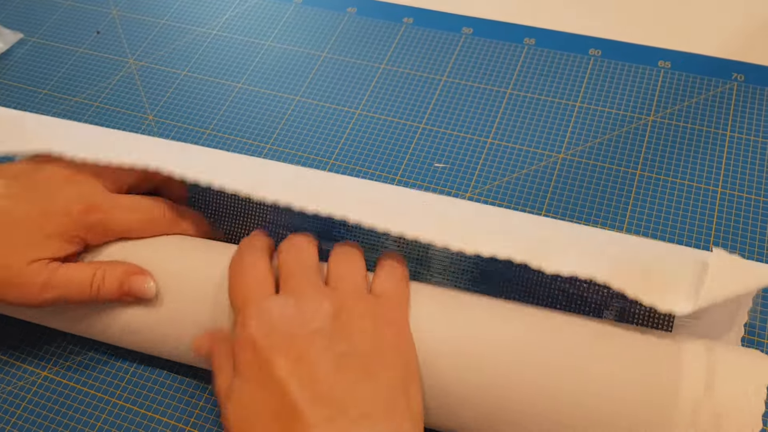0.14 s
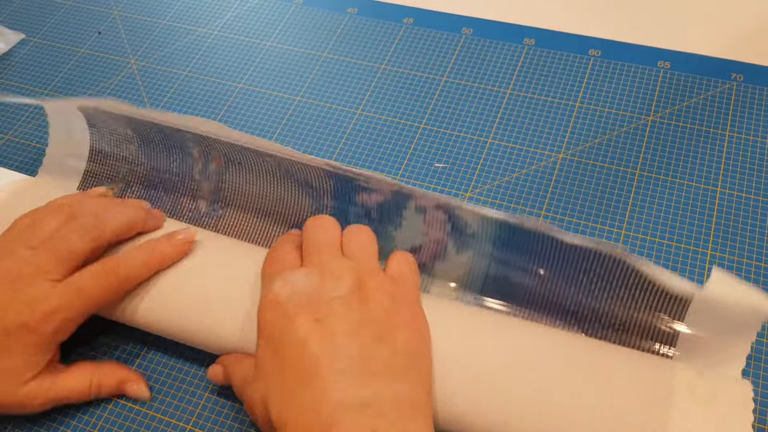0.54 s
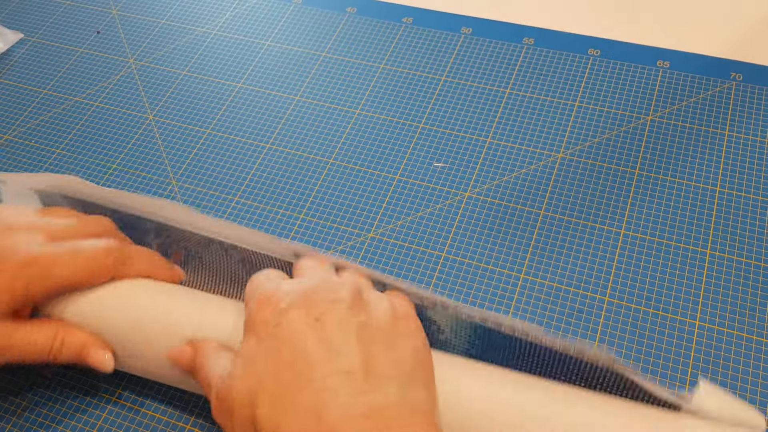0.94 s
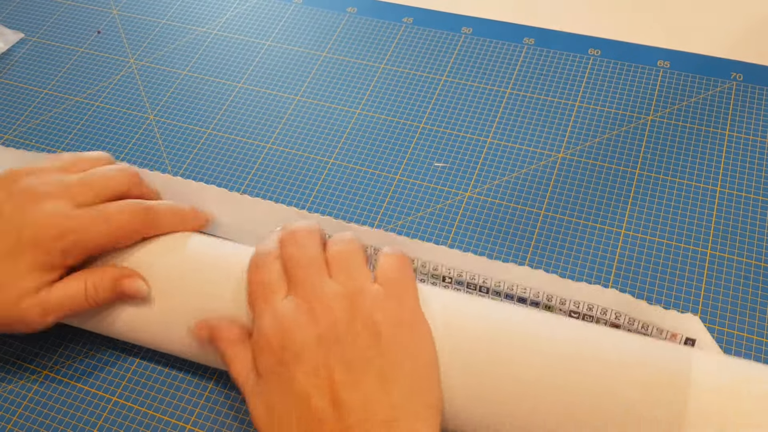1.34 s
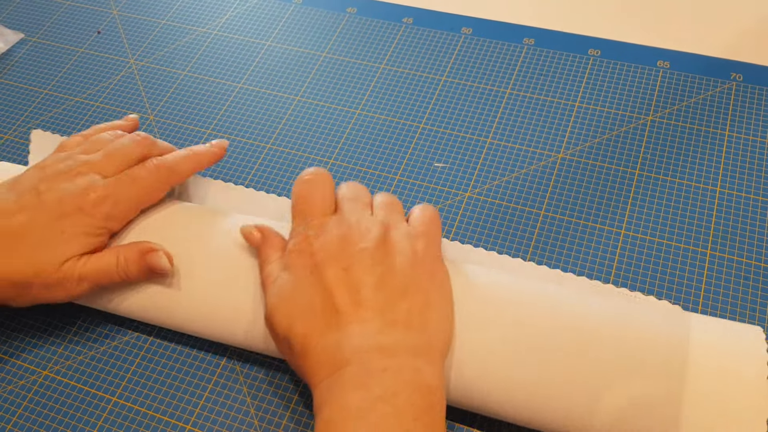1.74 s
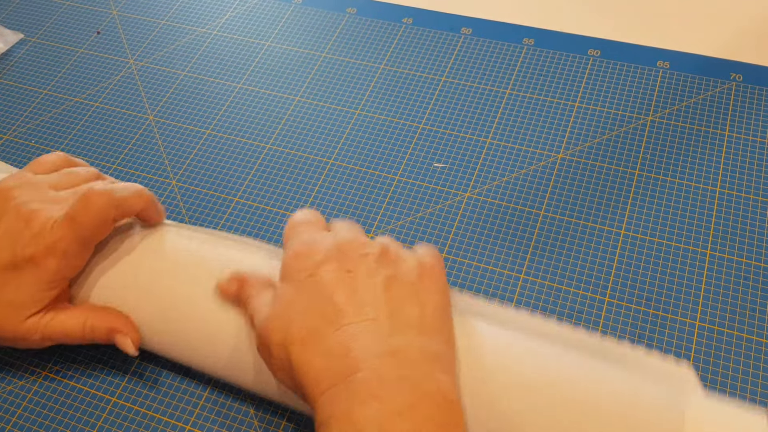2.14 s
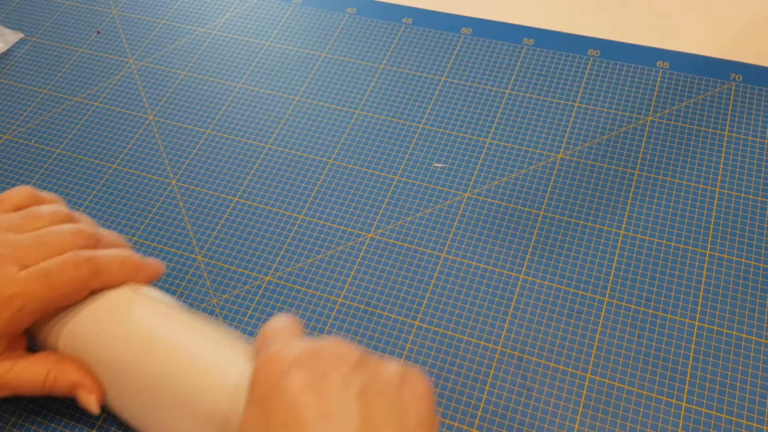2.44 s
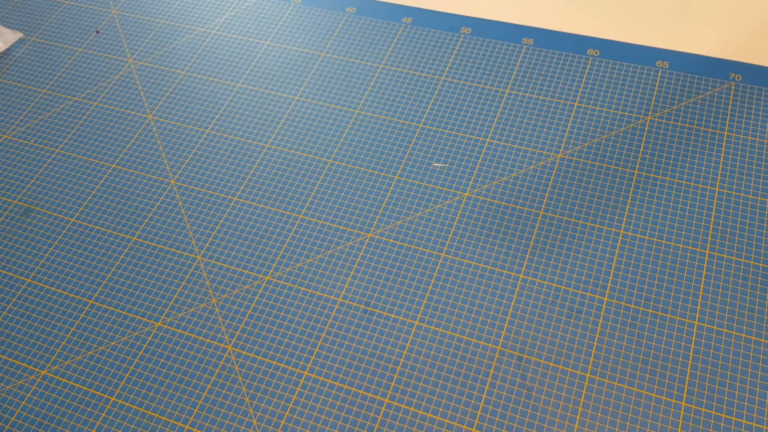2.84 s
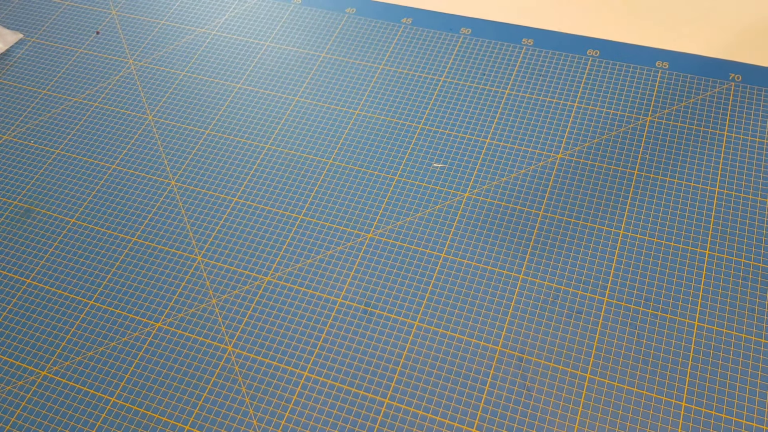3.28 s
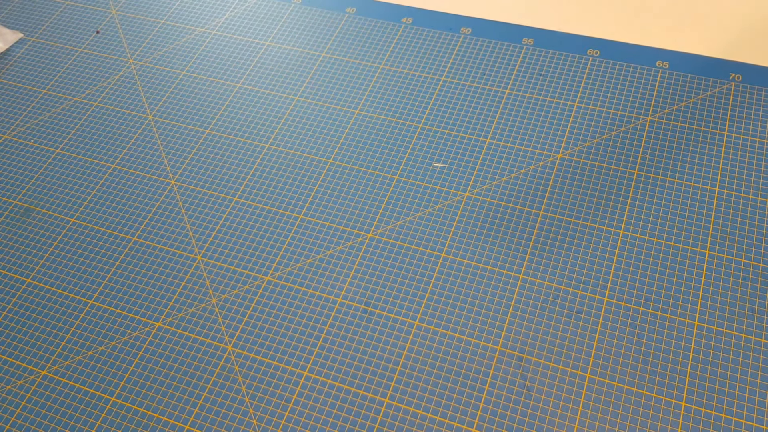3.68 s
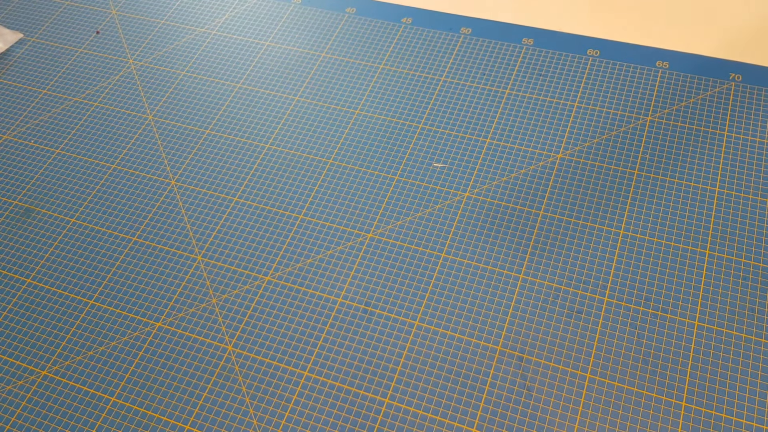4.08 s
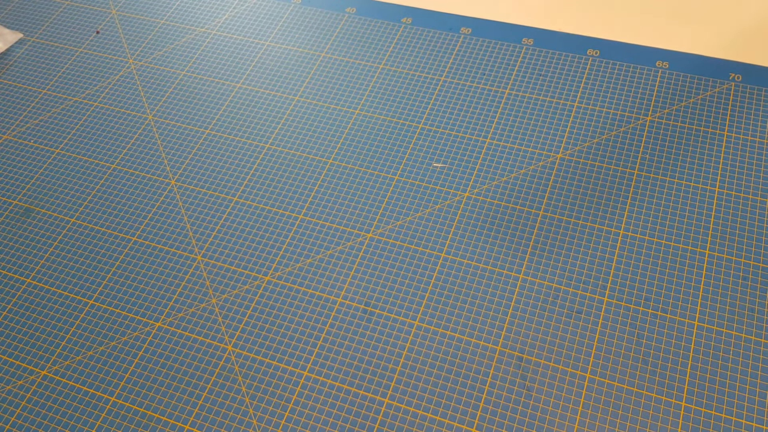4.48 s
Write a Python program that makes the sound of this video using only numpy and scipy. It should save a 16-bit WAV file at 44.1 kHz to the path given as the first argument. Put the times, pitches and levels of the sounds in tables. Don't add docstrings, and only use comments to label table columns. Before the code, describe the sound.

Hands roll up a stiff film-and-paper-backed sheet on a table mat, with dry rustling, crisp crackles and soft hollow taps, then carry it away.

```python
import sys
import numpy as np
from scipy import signal
from scipy.fft import rfft, irfft, next_fast_len
from scipy.io import wavfile
from scipy.ndimage import uniform_filter1d, map_coordinates

SR = 44100
rng = np.random.default_rng(int(sys.argv[2]) if len(sys.argv) > 2 else 0)


def level_to_linear(level):
    exponent = np.asarray(level, float) / 20
    return 10 ** exponent


def wav_record(signal):
    frames = np.transpose(np.atleast_2d(signal))
    bounded = np.clip(frames, -1, 1)
    quanta = np.round(bounded * 32767).astype(np.int16)
    wavfile.write(sys.argv[1], SR, quanta)


N = 203591
TIME = np.arange(N) / SR


def unit(x):
    return x / np.sqrt(np.mean(x ** 2) + 1e-20)


def along(points, hz):
    f, v = np.transpose(points)
    return np.interp(np.log(hz + 1), np.log(f + 1), v)


def curves(rows):
    s, *cols = np.transpose(rows)
    return [np.interp(TIME, s, c) for c in cols]


def gate_of(rows):
    return np.interp(TIME, [rows[0][0], rows[1][0], rows[-2][0], rows[-1][0]], [0, 1, 1, 0])


def wobble(rate):
    knots = rng.standard_normal(int(N * rate / SR) + 4)
    return map_coordinates(knots, [np.arange(N) * rate / SR])


def jerks(rate, fade):
    kicks = (rng.random(N) < rate / SR) * np.minimum(rng.exponential(size=N), 2)
    keep = np.exp(-1 / (SR * fade))
    saw = signal.lfilter([1], [1, -keep], kicks)
    return unit(saw - saw.mean())


def swells(s, peak_db, rise, fall):
    round_db = 2.5
    t = np.arange(0, N / SR + .002, .001)
    late = t - np.asarray(s)[:, None]
    drop_db = np.where(late < 0, late * rise, late * fall)
    db = np.asarray(peak_db)[:, None] + round_db - np.hypot(drop_db, round_db)
    power = (level_to_linear(db) ** 2).sum(0)
    return np.interp(TIME, t, 10 * np.log10(power + 1e-14))


def filtered(x, response):
    m = next_fast_len(N + SR // 2)
    return irfft(rfft(x, m) * response(np.fft.rfftfreq(m, 1 / SR)), m)[..., :N]


def lead(hz):
    lead_s = 0.0002
    return np.exp(1j * np.pi * hz * lead_s * np.array([[1], [-1]]))


def place(sounds, times, pan_db):
    out = np.zeros((2, N + sounds.shape[-1]))
    for sound, s, db in zip(sounds, times, pan_db):
        out[:, round(s * SR):][:, :sounds.shape[-1]] += sound * level_to_linear([[db / 2], [-db / 2]])
    return out[:, :N]


# f/Hz, likeness [0 to 1]
LIKENESS = [(40, 0.35), (100, 0.8), (180, 0.89), (290, 0.95), (640, 0.9), (1400, 0.077), (3000, 0.053),
            (15000, 0.022)]


def ports(pair, spectrum):
    turn = lambda hz: np.arccos(np.clip(along(LIKENESS, hz), -1, 1)) / 2
    colour = lambda hz: level_to_linear(along(spectrum, hz)) * [np.cos(turn(hz)), np.sin(turn(hz))]
    mid, side = filtered(pair, colour)
    return filtered(np.array([mid + side, mid - side]), lead)


def friction(spectrum, catch, density, grain_db):
    where = rng.random(N) < density / SR
    size_db = 5 * np.minimum(rng.exponential(size=N), 2.5)
    grains = unit(where * level_to_linear(size_db)) * level_to_linear(grain_db)
    rough = rng.standard_normal((2, N)) * (catch + grains)
    return unit(ports(rough, [(0.97, -120)] + list(spectrum) + [(SR / 2, -120)]))


# f/Hz, level/dB [per Hz]
QUIET_ROOM = [(88, -33), (150, -26), (280, -22), (624, -24.5), (689, -33), (1870, -30.5), (2920, -32),
              (3620, -35), (16000, -27)]


def air():
    return level_to_linear(-75.5) * friction(QUIET_ROOM, 1, 30, grain_db=-30)


# f/Hz, time to fall 60 dB [s]
ROOM_DECAY = [(200, 0.31), (600, 0.17), (2000, 0.35), (12000, 0.17)]


def room(x):
    build_s = .006
    turn = (np.arange(N) // (SR // 8)) % 4
    hz, t, z = signal.stft(rng.standard_normal((4, 2, SR // 2)), SR, nperseg=256)
    decay = level_to_linear(-60 * t / along(ROOM_DECAY, hz)[:, None])
    tails = signal.istft(z * decay, SR, nperseg=256)[1]
    tails = tails * (1 - np.exp(-np.arange(tails.shape[-1]) / SR / build_s))
    out = np.zeros((2, N))
    for k, tail in enumerate(tails):
        late = np.pad(x.mean(0) * (turn == k), (130, 0))
        out += signal.oaconvolve(late[None], tail / np.linalg.norm(tail[0]), axes=1)[:, :N]
    return out


# t/s, table top level/dB, frame level/dB
LEANING = [(0.06, -82, -95), (0.22, -73, -87), (0.35, -56, -66.5), (0.55, -65.5, -90), (0.68, -84, -80.5),
           (1.1, -62.5, -73), (1.41, -54.5, -83), (1.61, -57.5, -80.5), (1.73, -69.5, -66),
           (1.98, -70, -98), (2.18, -73, -74), (2.3, -53.5, -65), (2.61, -75, -70), (2.94, -61, -86),
           (3.2, -65, -81), (4.11, -58, -87)]
# f/Hz, level/dB [per Hz]
TABLE_TOP = [(60, -27.5), (100, -4), (130, -5), (160, -16.5), (200, -15.5), (260, -26)]
# f/Hz, level/dB [per Hz]
TABLE_FRAME = [(20, -19), (30, -23), (50, -9), (80, -15), (110, -10.5)]


def table():
    s, top_db, frame_db = np.transpose(LEANING)
    rise, fall = 210, 150
    load = lambda db, rest_db: np.hypot(level_to_linear(swells(s, db, rise, fall)), level_to_linear(rest_db))
    top = load(top_db - 4, -81) * friction(TABLE_TOP, .5, 32, grain_db=-14)
    frame = load(frame_db + 0.5, -79.5) * friction(TABLE_FRAME, 0.83, 30, grain_db=-12.0)
    return top + level_to_linear([[-1.5], [1.5]]) * frame


# t/s, level/dB [peak], f/Hz, time to fall 60 dB [s]
LANDINGS = [
    (0.33, -66, 142, 0.067),
    (1.728, -52, 133, 0.28),
    (2.274, -30, 137, 0.21),
    (2.31, -54, 117, 0.25),
    (2.588, -54, 95, 0.21),
    (2.927, -41, 138, 0.19),
    (3.187, -67, 121, 0.31),
    (4.09, -45, 126, 0.2),
]


def booms():
    s, db, hz, t60 = np.transpose(LANDINGS)[..., None]
    t = np.arange(SR // 2) / SR
    level = level_to_linear(db - 7.5 - 60 * t / t60) * (1 - np.exp(-t / 0.016))
    ring = level * np.sin(2 * np.pi * hz * t)
    return place(ring, s[:, 0], np.full(len(s), -1.5))


# t/s, level/dB
DRAGGING = [
    (2.72, -44),
    (2.908, -60),
    (2.97, -52.5),
    (3.044, -66.5),
    (3.2, -58.5),
    (3.224, -66),
    (3.292, -72),
    (3.352, -62),
    (3.52, -82),
]
# f/Hz, level/dB [per Hz]
ROLL_AIR = [(230, -60), (310, 3), (350, 7.5), (460, -2.5), (600, -4)]


def drag():
    level_db, = curves(DRAGGING)
    return gate_of(DRAGGING) * level_to_linear(level_db - 3.0) * friction(ROLL_AIR, 1, 60, grain_db=-18)


def gliding_noise(rows, width_hz, gain_db):
    level_db, hz = curves(rows)
    flutter = unit(filtered(rng.standard_normal((2, N)), lambda f: np.exp(-(f / width_hz) ** 2)))
    tone = np.sin(2 * np.pi * np.cumsum(hz) / SR)
    return gate_of(rows) * level_to_linear(level_db + gain_db) * flutter * tone


# t/s, level/dB, f/Hz
CLOSING_GAP = [
    (.49, -67, 911),
    (.53, -45, 1023),
    (.65, -40.5, 1043),
    (.8, -44.5, 1208),
    (.92, -39.5, 1331),
    (1.08, -54, 1370),
]


def closing_gap():
    return gliding_noise(CLOSING_GAP, 180, gain_db=0.5)


# t/s, level/dB, f/Hz
SKID = [
    (1.39, -60, 1950),
    (1.43, -50, 1900),
    (1.465, -49, 1900),
    (1.485, -36, 1900),
    (1.51, -44, 2050),
    (1.54, -43, 2250),
    (1.56, -53, 2200),
    (1.582, -43, 2010),
    (1.6, -62, 2040),
]


def fingertip_skid():
    return gliding_noise(SKID, 360, gain_db=4.0)


# t/s, level/dB [depth of the hush]
STICKING = [(0.139, 3.5), (0.3436, 13), (1.1365, 6.5), (1.551, 13), (3.3547, 7), (3.5512, 16), (3.035, 3),
            (3.7039, 7), (4.0491, 1), (4.3409, 0), (4.3639, 0), (4.078, 8), (4.558, 3)]


def held():
    stuck_db = sum(db * (TIME > s - .007) * (TIME < s + .0008) for s, db in STICKING)
    return level_to_linear(-uniform_filter1d(stuck_db, size=40))


def patchy(x):
    z = signal.stft(x, nperseg=256)[2]
    field = uniform_filter1d(rng.standard_normal(z.shape[1:]), size=7, axis=0)
    field = uniform_filter1d(field, size=9, axis=1)
    return signal.istft(z * level_to_linear(1.4 * unit(field) - .3), nperseg=256)[1][:, :N]


# [dB; pressing sounds the roll, skimming only the film]
ROLLING_STROKES = [(0.04, -48, 590, 150, 9), (0.067, -49, 100.0, 380.0, -8),
                   (0.164, -51, 298, 120.0, -10.5), (0.29, -47.5, 189, 228, 3.5),
                   (0.339, -56.5, 660, 426, 17.5), (0.372, -51.5, 220.0, 105, -1),
                   (0.515, -44, 880, 114, 7), (0.566, -46.5, 184, 540.0, -24),
                   (0.647, -41.5, 310.0, 58.5, 1), (0.727, -46.5, 90, 110.0, 4.5),
                   (0.826, -37.5, 252, 110.0, -5.5), (0.909, -42, 210.0, 126, 2.5),
                   (1.018, -42.5, 315, 154, 2.5), (1.152, -50, 130.0, 340.0, 0),
                   (1.206, -52, 390.0, 54.5, -3), (1.381, -48.5, 278, 90.5, -3),
                   (1.455, -49.5, 470.0, 67.5, 0.5), (1.553, -45.5, 1200.0, 223, -8.5),
                   (1.643, -58, 760.0, 288, -1), (1.744, -51, 149, 440.0, -5),
                   (1.775, -50.5, 580.0, 250.0, -3.5), (1.926, -52.5, 100.0, 177, 3)]
LEAVING_STROKES = [(2.115, -53, 890, 100, 8.5), (2.145, -43, 1200, 99, -2.5),
                   (2.171, -33.5, 420, 168, -10.5), (2.325, -46.5, 59, 130, 2.5),
                   (2.434, -38, 200, 92, -6.5), (2.515, -46.5, 82, 500, 0), (2.57, -47.5, 130, 100, -9),
                   (2.629, -41.5, 170, 187, -7.5), (2.7, -39, 150, 457, -17), (2.785, -42, 400, 268, -11),
                   (2.88, -56, 4200, 810, 7), (2.955, -63, 16, 150, -0.5), (3.07, -57, 160, 200.0, -12.5),
                   (3.219, -58, 170, 200, -6.5), (3.358, -69.5, 2200, 156, 4.5),
                   (3.562, -65.5, 2100, 205, -15), (3.586, -79, 12, 70.0, -27),
                   (3.722, -65.5, 1100, 30.0, -42), (3.823, -65.5, 200, 320.0, 9),
                   (3.868, -55, 196, 146, 1), (3.933, -61, 290, 385, 1), (4.081, -63, 420, 111, -50),
                   (4.14, -64, 410, 113, 0), (4.225, -68, 390, 116, -11), (4.347, -81, 840.0, 210.0, -29),
                   (4.464, -89, 310, 22, 9.5), (4.561, -68.5, 890, 100, -5)]
# t/s, level/dB
MAT_CONTACT = [(0, -5), (0.09, 1), (0.15, -3.5), (0.35, -1.5), (0.8, -5.5), (1.1, -3.5), (2.0, -5.5),
               (2.7, -6), (3.4, -7), (3.7, -26), (4.62, -18)]
# f/Hz, level/dB [per Hz]
FILM_COLOUR = [(3000, -22.5), (5000, -15.5), (6000, 0), (7900, -3), (9000, -2.5), (11000, 0.5), (15000, 0),
               (16000, -12.5)]
PAPER_COLOUR = [(1600, -17), (2300, -5), (3500, -4), (5500, -5), (7000, -34)]
WALL_COLOUR = [(440, -23.5), (750, -6), (772, -4.5), (1040, -2), (1120, -4), (1250, -2), (1390, -2),
               (1510, -3.5), (1680, -6.5), (1850, -4), (2400, -7.5), (3120, -15), (5280, -120)]
HOLLOW_COLOUR = [(150, -9), (240, 2.5), (450, 8), (720, 4.5), (1000, -43.5)]


def rubbing():
    s, db, rise, fall, weight_db = np.transpose(ROLLING_STROKES + LEAVING_STROKES)
    stroke = lambda share: swells(s, db + share * weight_db, rise[:, None], fall[:, None])
    film_db, paper_db, wall_db = stroke(0), stroke(0.27), stroke(0.93)
    middle_db = -45.5
    hollow_db = middle_db + 0.67 * (wall_db - middle_db) - 3.5 + curves(MAT_CONTACT)[0]
    slip = .6 * jerks(80, 0.007) + 0.45 * wobble(200)
    film_slip, paper_slip, wall_slip, hollow_slip = level_to_linear(np.outer([1.2, 1, .8, 1.1], slip))
    film = level_to_linear(film_db + 4.0) * friction(FILM_COLOUR, film_slip, 870, grain_db=-11)
    paper = level_to_linear(paper_db + 2.2) * friction(PAPER_COLOUR, paper_slip, 600, grain_db=-16)
    wall = level_to_linear(wall_db + 2.6) * friction(WALL_COLOUR, wall_slip, 300, grain_db=-11)
    hollow = level_to_linear(hollow_db + 3.0) * friction(HOLLOW_COLOUR, hollow_slip, 150, grain_db=-5.5)
    away = np.interp(TIME, (2.74, 3.16), [0, 0.53])
    film = film - away * filtered(film, lambda hz: 1 / (1 + (10300 / (hz + 1)) ** 12))
    return film + paper + wall + hollow


# t/s, level/dB [peak], f/Hz [centre], low part level/dB
FILM_SNAPS = [(0.1385, -24, 13500, -23), (0.1619, -33, 14700, -13), (0.2652, -30, 8500, -12),
              (0.3256, -28, 5500, -15), (0.3304, -31, 9380, -5), (0.3427, -19.5, 9000, -9),
              (0.3452, -23, 11000, -9), (0.349, -31, 9000, -8), (0.4773, -40, 12200, -20),
              (0.5227, -30, 4350, -14), (0.7028, -26, 5850, -9), (0.9737, -25, 9960, -20),
              (0.9975, -23, 12200, -14), (1.068, -32, 11100, -20), (1.1088, -27, 11300, -15),
              (1.1367, -24, 13000, -13), (1.1911, -33, 11700, -17), (1.3194, -39, 4510, -14),
              (1.3478, -40, 13100, -20), (1.3964, -33, 5620, -8), (1.55, -23.5, 8500, -19),
              (1.5794, -39, 3000, -6), (1.6356, -37, 4800, -10), (1.6929, -43, 5000, -10),
              (1.732, -35, 4300, -17), (1.7724, -39, 4250, -14), (1.7769, -34, 11700, -15),
              (1.8097, -34, 10900, -19), (1.8511, -40, 8570, -8), (1.8667, -37, 3920, -22),
              (1.8875, -34, 5870, -14), (2.0297, -42, 6360, -15), (2.0787, -46, 10900, -20),
              (2.1839, -23, 5720, -16), (2.388, -30, 5380, -16), (2.6735, -33, 2500, -3),
              (2.7641, -31, 12400, -20)]
FILM_TICKS = [(2.8744, -47, 12100, -6), (2.8844, -44, 6470, -7), (2.919, -46, 3500, -6),
              (2.9597, -47, 5760, -11), (2.9744, -46, 6160, -16), (3.035, -41, 9740, -20),
              (3.178, -51, 2600, -4), (3.198, -47, 2700, -4), (3.229, -50, 4800, -12),
              (3.3547, -48, 5560, -6), (3.3946, -50, 10100, -20), (3.5139, -60, 14300, -17),
              (3.5512, -52, 8920, -16), (3.5627, -52, 9780, -18), (3.7039, -54, 9550, -9),
              (3.7159, -49, 12100, -18), (3.935, -36, 10900, -19), (3.9404, -42, 13300, -17),
              (4.0491, -43, 12400, -31), (4.0749, -41, 12100, -25), (4.078, -35, 8620, -28),
              (4.3409, -47, 11100, -27), (4.3639, -50, 11400, -32), (4.434, -63, 6000, -25),
              (4.557, -45, 8460, -25)]
# f/Hz, level/dB [per Hz]
PAPER_CRACK = [(1000, -73), (1500, 15.5), (4500, -0.5), (6500, -41)]


def snaps():
    s, db, hz, low_db = np.transpose(FILM_SNAPS + FILM_TICKS)
    counts = [len(FILM_SNAPS), len(FILM_TICKS)]
    pan_db = np.repeat([-0.5, 2.5], counts)
    wide_db = np.repeat([6, 11], counts)[:, None, None]
    length = .002 * level_to_linear(.5 * np.clip(low_db + 25, 0, 12))
    length = np.clip(length, .0003, .03)[:, None, None, None]
    t = np.arange(next_fast_len(SR // 30)) / SR - .002
    burst = rng.standard_normal((len(s), 2, 2, len(t))) * level_to_linear(-20 * t / length) * (t > 0)
    burst[:, :, 1] += 0.7 * burst[:, :, 0]
    octaves = np.log2(np.fft.rfftfreq(len(t), 1 / SR) / hz[:, None, None] + 1e-3)
    ring = irfft(rfft(burst[:, 0]) * level_to_linear(-wide_db * octaves ** 2), len(t))
    ring = ring / np.abs(ring).max(2, keepdims=True)
    start = s - .0005
    bright = place(level_to_linear(db + 3)[:, None, None] * ring, start, pan_db)
    dull = place(level_to_linear(db + low_db + 1.5)[:, None, None] * burst[:, 1], start, pan_db)
    return filtered(bright, lead) + filtered(dull, lambda f: lead(f) * level_to_linear(along(PAPER_CRACK, f)))


# f/Hz, width [Hz], level/dB
ROLL_NOTES = [(430, 22, -14.5), (510, 8.3, -17.5), (596, 22, -13), (957, 24, -7), (1200, 40, -8),
              (2580, 150, -13)]


def ringing(f):
    return sum(level_to_linear(db) * 1j * f * w / (c * c - f * f + 1j * f * w) for c, w, db in ROLL_NOTES)


# t/s, level/dB [peak], f/Hz
FINGER_TAPS = [(0.023, -35, 410), (0.0438, -32.5, 910), (0.063, -28.5, 820), (0.092, -32.5, 454),
               (0.1306, -39.5, 623), (0.161, -41, 226), (0.2209, -20, 530), (0.3246, -31, 297),
               (0.3448, -27, 644), (0.4415, -38.5, 352), (0.478, -46.5, 325), (0.514, -36, 1000),
               (0.5196, -23.5, 1240), (0.5303, -43, 1080), (0.5747, -28.5, 560), (0.688, -22.5, 493),
               (0.703, -28, 387), (0.9775, -33, 514), (1.0562, -32.5, 396), (1.083, -34, 227),
               (1.1197, -34, 327), (1.1849, -43, 543), (1.19, -43.5, 467), (1.2029, -44.5, 596),
               (1.317, -48, 300), (1.325, -46.5, 463), (1.3534, -44, 437), (1.396, -36.5, 2000),
               (1.402, -39, 345), (1.4241, -20.5, 416), (1.5721, -48, 670), (1.579, -30, 1400),
               (1.603, -31.5, 304), (1.604, -35, 700), (1.6153, -34, 636), (1.6786, -41.5, 610),
               (1.695, -34.5, 665), (1.7339, -38, 252), (1.7729, -28, 530), (1.8163, -50, 429),
               (1.8528, -43, 980), (1.862, -43.5, 607), (1.8825, -36.5, 540), (1.8905, -40.5, 600),
               (1.8986, -39, 606), (1.9299, -20.5, 554), (1.9745, -38.5, 466), (2.0385, -43, 580)]
LIFT_BUMPS = [(2.1829, -34, 760), (2.255, -32, 510), (2.2821, -31.5, 324), (2.305, -40, 300),
              (2.345, -38, 278), (2.3892, -34, 563), (2.406, -36, 300), (2.5071, -31, 1200),
              (2.5528, -36, 1217), (2.614, -38.5, 550), (2.627, -33.5, 1020), (2.6734, -36, 988),
              (2.7, -33.5, 553), (2.7169, -35.5, 860), (2.8374, -50, 429), (2.874, -41, 1360),
              (2.881, -50, 423), (2.919, -41, 1230), (2.963, -54, 1000), (2.9648, -54.5, 370),
              (2.969, -51, 420), (2.979, -69, 353), (3.551, -62, 529), (3.5607, -58, 765),
              (3.5663, -69, 748), (3.6527, -68, 810), (3.7042, -60, 748), (3.9313, -46, 570),
              (3.944, -50, 600), (3.95, -51.9, 529)]
EDGE_KNOCKS = [
    (1.137, -23.5, 1560),
    (3.3561, -38, 1070),
    (3.3645, -45, 865),
    (3.3776, -48, 1000),
    (3.456, -48, 1200),
    (3.4575, -56.5, 410),
    (3.467, -63, 480),
]


def taps():
    s, db, hz = np.transpose(FINGER_TAPS + LIFT_BUMPS + EDGE_KNOCKS)
    counts = [len(FINGER_TAPS), len(LIFT_BUMPS), len(EDGE_KNOCKS)]
    wet_db = np.repeat([-5, 0.5, -5], counts)
    lasts = np.repeat([1, 1, 1.32], counts)[:, None]
    cycles = np.arange(SR // 40) / SR * hz[:, None]
    swell = (cycles / .55) ** (3.66 / lasts) * np.exp(-cycles / (0.27 * lasts ** 2))
    swell = swell / swell.max(1, keepdims=True)
    nail = level_to_linear(-15.5) * np.sin(2 * np.pi * 2.27 * cycles) * np.exp(.9 - cycles / 0.88)
    push = -(np.sin(2 * np.pi * cycles) + nail) * swell * level_to_linear(db + 0.5)[:, None]
    small = lambda f: lead(f) * (1 + level_to_linear(5.5) * ringing(f)) * f ** 2 / (f ** 2 + 170 ** 2)
    pan_db = np.full(len(s), 2.5)
    heard = filtered(place(push, s + 0.00062, pan_db), small)
    to_walls = filtered(place(push * level_to_linear(wet_db)[:, None], s + 0.00062, pan_db), small)
    return heard, to_walls


def scene():
    background = air() + table() * level_to_linear([[-.4], [.4]]) + booms() + drag()
    sheets = held() * patchy(rubbing()) + fingertip_skid() + closing_gap()
    snap = snaps()
    tap, tap_to_walls = taps()
    thin_tap = filtered(tap_to_walls, lambda f: f ** 2 / (f ** 2 + 250 ** 2))
    walls = room(thin_tap + level_to_linear(-10) * snap)
    return background + sheets * level_to_linear([[.3], [-.3]]) + snap + tap + walls


def roll_off(x):
    return signal.sosfilt(signal.butter(12, 16860, fs=SR, output="sos"), x)


def record(dry):
    top_hz = 15900
    mix = filtered(dry, lambda hz: 1 / (1 + (hz / top_hz) ** 120))
    return roll_off(mix)


dry = scene()
out = record(dry)
wav_record(out)
```